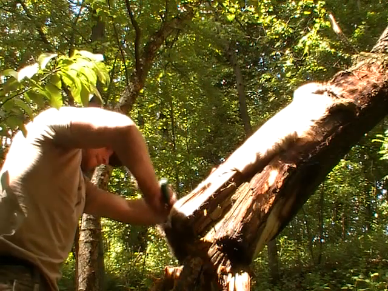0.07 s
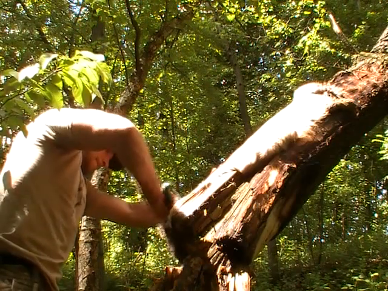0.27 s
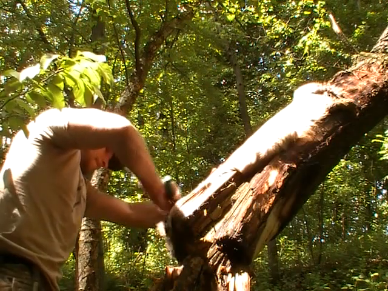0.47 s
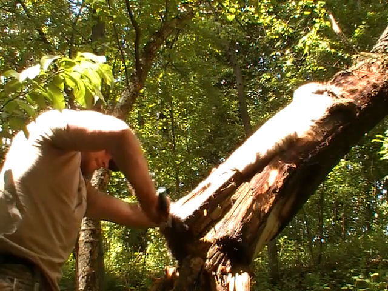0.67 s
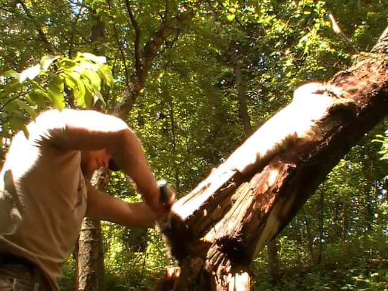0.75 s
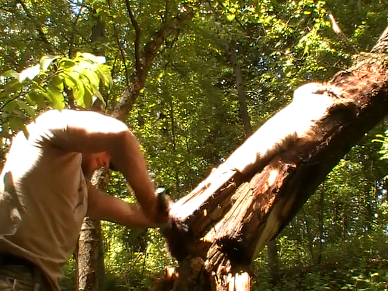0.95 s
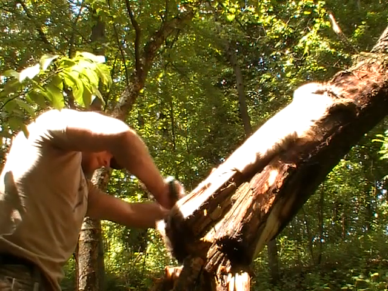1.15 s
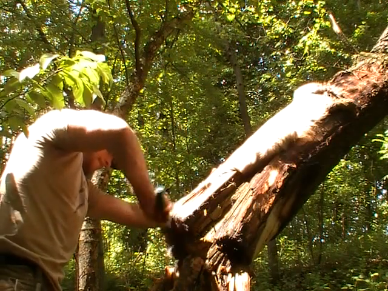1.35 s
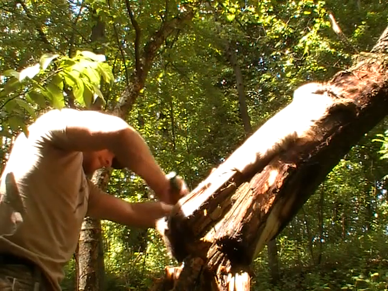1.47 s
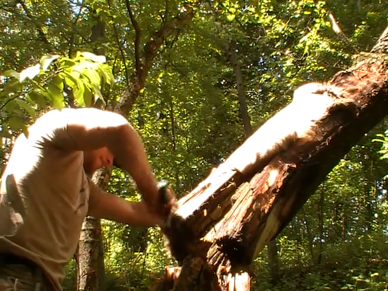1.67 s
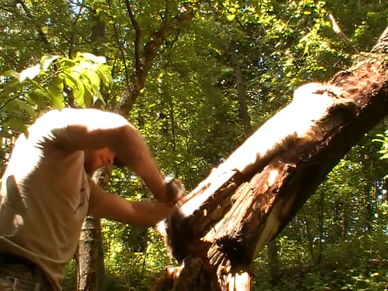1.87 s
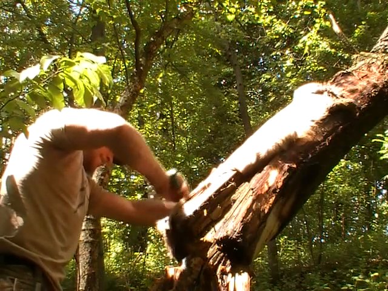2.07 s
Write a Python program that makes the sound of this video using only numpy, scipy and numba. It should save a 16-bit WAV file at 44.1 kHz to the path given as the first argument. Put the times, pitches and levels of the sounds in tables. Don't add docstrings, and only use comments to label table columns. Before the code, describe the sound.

Short, wet, gritty knife scrapes on hide in a wood, with one fly buzzing past

```python
import sys
import numpy as np
from scipy import signal
from scipy.fft import rfft, irfft
from scipy.io import wavfile
from scipy.ndimage import uniform_filter1d
from numba import njit

SR = 44100
rng = np.random.default_rng(int(sys.argv[2]) if len(sys.argv) > 2 else 0)


def gain_from_db(level_db):
    decades = np.asarray(level_db, float) / 20
    return 10 ** decades


def to_wav(sig):
    pcm = np.clip(np.atleast_2d(sig), -1, 1) * 32767
    pcm = np.round(pcm).astype(np.int16)
    wavfile.write(sys.argv[1], SR, pcm.T)


N = 92610
T = np.arange(N) / SR

# hz, level_db (per Hz)
LEAF_SPECTRUM = [(50, -38), (200, -18.5), (400, -6.5), (950, 0), (2100, -6.5), (4200, -7), (10600, -11),
                 (15600, -23)]
# start_s, level_db
BREEZE = [(0.0, -52.5), (0.13, -52.5), (0.39, -50), (0.61, -52), (1.34, -51), (2.1, -53)]

# start_s, length_s, pitch_hz, level_db, third_partial_db
CHEEPS = [(0.109, 0.044, 2500, -56.5, 3.5), (0.222, 0.042, 2470, -55, 1), (0.401, 0.041, 2530, -55, -1),
          (.566, .042, 2470, -55, -1), (0.733, 0.043, 2500, -56, 2), (1.047, .036, 2420, -58, 0),
          (1.355, .035, 2380, -58.5, -1), (1.443, 0.044, 2470, -56.5, -2.5),
          (1.603, 0.042, 2490, -54.5, -1), (1.764, 0.034, 2300, -58.5, 4), (1.911, 0.041, 2205, -58, -4),
          (2.031, 0.036, 2300, -55.5, -0.5)]
# start_s, length_s, pitch_hz, level_db
FAR_NOTES = [(1.043, 0.046, 810, -51), (0.96, .04, 720, -62), (.975, 0.06, 3340, -63),
             (1.8, .018, 5200, -53)]
# delay_s, level_db
TRUNK_ECHOES = [(.009, -8), (.021, -13), (.038, -19), (.065, -23)]

# time_s, wingbeat_hz, level_db, edge_db (per octave)
FLY_PASS = [(0.261, 197, -56, -3), (.36, 186, -68, 0), (0.408, 184.6, -55, 5), (.431, 184.5, -42, 1),
            (.4405, 184.8, -35, 0), (0.447, 186, -27.5, 0), (0.466, 188, -28.5, -1), (0.478, 198, -33, -2),
            (.5, 220, -51, -2)]
# hz, level_db
WING_TONE = [(185, -13), (370, -2), (560, .1), (750, -8), (930, -6), (1600, -15), (2200, -26), (4000, -42)]
# start_s, peak_db
BUMPS = [(.4489, -24), (.4544, -27), (.4695, -9), (.4746, -9.5), (.4785, -24), (.4832, -27), (.4877, -25)]
# mode_hz, level_db, t60_s
GRILLE_MODES = [(800, -6, .005), (1800, -5, .003), (2700, -4, .003), (3800, -7, .002), (5200, -2, .0018),
                (7000, -4, .0014), (8800, -2, .0016), (10800, 0, .002), (13000, -5, .0015)]

# start_s, peak_db
SNAGS = [(0.226, -33), (0.264, -42), (0.5475, -38), (0.8542, -37), (0.8755, -35), (0.9136, -37),
         (1.1818, -33), (1.1905, -35), (1.2234, -26), (1.228, -29), (1.2387, -34), (1.2463, -45),
         (1.546, -37), (1.795, -43), (1.8078, -42), (1.8173, -32), (1.85, -42)]

# time_s, pressure_db, slide_db (a faster blade hisses more against the drag)
STROKES = [
    [(0.18, -60, -5), (0.186, -53.5, -11), (0.216, -48, -1), (0.228, -41.5, -13.5), (0.256, -50.5, -5),
     (0.264, -48.5, -4), (0.285, -56, -4)],
    [(0.51, -49, -7), (0.52, -51, -12), (0.536, -45.5, -3.5), (0.574, -47, -5.5), (0.594, -62, -1.5),
     (0.6, -57, -9), (0.605, -64, 4)],
    [(0.81, -64, -9), (0.842, -47, -14), (0.864, -47, -1), (0.886, -47.5, -3.5), (0.922, -53, 4),
     (0.932, -55, -1), (0.938, -63, 5)],
    [(1.15, -56, -20), (1.162, -46, -11), (1.184, -43, -8), (1.246, -47.5, 0.5), (1.274, -56.5, -2)],
    [(1.472, -59, -15), (1.494, -48, -20), (1.522, -45.5, -7), (1.562, -45.5, -7), (1.588, -64, 1)],
    [(1.788, -59, -8), (1.798, -45.5, -13), (1.818, -48.5, -3), (1.856, -49.5, -1), (1.892, -55.5, 1.5),
     (1.905, -61, 2)],
    [(2.082, -68, -2), (2.088, -51, -14), (2.1, -50.5, -11)],
]
# upper_rings_db, lowest_ring_hz, lean_db (change of upper rings start to end)
TENSION = [(-1, 1056, 0), (0.5, 1085, -4), (2.5, 1034, 10), (4, 1052, 2), (1, 1056, 0), (3, 1017, -12),
           (4, 1080, -3)]
# ratio, width_hz, level_db
HIDE_RINGS = [(1, 400, 0), (1.55, 650, -3.5), (2.15, 1100, -6), (3.3, 2200, -6)]
# hz, level_db (per Hz)
EDGE_HISS = [(1500, -24.5), (2800, -4.5), (5700, -7.5), (7800, -1), (12500, -6), (15600, -16)]
# time_s, slip_hz, level_db
SQUEAK = [(1.162, 1150, -55), (1.168, 1750, -48), (1.173, 2290, -47.5), (1.186, 2330, -46),
          (1.192, 2050, -47), (1.198, 1550, -48), (1.204, 1250, -55)]
# time_s, slip_hz, level_db
CREAK = [(1.468, 1400, -65), (1.49, 1660, -53), (1.506, 1763, -55), (1.518, 1370, -57), (1.532, 980, -58),
         (1.54, 980, -49)]


def level(x, db):
    return x * gain_from_db(db) / np.sqrt(np.mean(x ** 2))


@njit
def svf(x, hz, width):
    y, band, low = np.empty(len(x)), 0., 0.
    for i in range(len(x)):
        g, k = np.tan(np.pi * hz[i] / SR), width / hz[i]
        v = (band + g * (x[i] - low)) / (1 + g * (g + k))
        band, low, y[i] = 2 * v - band, low + 2 * g * v, k * v
    return y


def svf_twice(x, hz, first_width, second_width):
    return svf(svf(x, hz, first_width), hz, second_width)


def colour(x, table, size=2048):
    hz, db = np.array(table).T
    f = np.arange(size // 2 + 1) * SR / size
    cepstrum = irfft(np.interp(np.log(f + 1), np.log(hz), db) * np.log(10) / 20)
    cepstrum[1:size // 2] *= 2
    cepstrum[size // 2 + 1:] = 0
    return signal.fftconvolve(x, irfft(np.exp(rfft(cepstrum))))[:N]


def walk(rate_hz):
    k = int(SR / rate_hz)
    held = np.repeat(rng.standard_normal(N // 100), k)[:N]
    slewed = uniform_filter1d(uniform_filter1d(held, k), k)
    return slewed / slewed.std()


def grit():
    grain_db = 3.6 * np.minimum(rng.exponential(size=N), 4)
    return level(rng.standard_normal(N) * gain_from_db(grain_db), 0)


def swing(rows):
    s, hz, db = np.array(rows).T[:3]
    edge = np.clip(np.minimum(T - s[0], s[-1] - T) * 200, 0, 1)
    return np.cumsum(np.interp(T, s, hz)) / SR, gain_from_db(np.interp(T, s, db)) * edge


def far_leaves():
    air, swell = colour(rng.standard_normal(N), LEAF_SPECTRUM), walk(2.7)
    spec, f = rfft(air), np.arange(N // 2 + 1) * SR / N
    out = 0
    for k in range(11):
        share = np.clip(1 - np.abs(np.log2(f / 20 + 1e-9) - k), 0, 1)
        flicker_db = 0.3 * swell + 0.8 * walk(8.03)
        out = out + irfft(spec * share, N) * gain_from_db(flicker_db)
    return level(out, -0.86) * gain_from_db(np.interp(T, *np.array(BREEZE).T))


def birds():
    rise, fall, top_at = .085, .06, .35
    sharpen_db = 6
    out, flutter, waver = np.zeros(N), [walk(220) for _ in range(5)], walk(200)
    for s, length, hz, db, third_db in CHEEPS:
        i = slice(int(s * SR), int((s + length) * SR))
        u = (T[i] - s) / length
        before_top = rise * (1 - u / top_at) ** 2
        after_top = fall * ((u - top_at) / (1 - top_at)) ** 2
        sag = np.where(u < top_at, before_top, after_top)
        phase = 2 * np.pi * np.cumsum(hz * (1 - sag + .01 * waver[i])) / SR
        swell = np.sin(np.pi * np.clip(u, 0, 1)) ** 0.34
        for k, part_db in enumerate([-11, 0, third_db, -7, -10]):
            tilt_db = sharpen_db * (min(k, 2) - 1.5) * (2 * u - 1)
            gain = gain_from_db(db + 3.5 + part_db + tilt_db + 2.8 * flutter[k][i])
            out[i] += gain * swell * np.sin((k + 1) * phase)
    for s, length, hz, db in FAR_NOTES:
        u = np.clip((T - s) / length, 0, 1)
        phase = 2 * np.pi * np.cumsum(hz * (1 - .05 * (1 - u) ** 2)) / SR
        out += gain_from_db(db + 1) * np.sin(np.pi * u) * np.sin(phase)
    echoes = sum(gain_from_db(db) * np.pad(out, (int(s * SR), 0))[:N] for s, db in TRUNK_ECHOES)
    return out + echoes


def grille_bumps():
    out, t = np.zeros(N), np.arange(1024) / SR
    for (s, db), chance in zip(BUMPS, rng.standard_normal((len(BUMPS), len(GRILLE_MODES)))):
        tick = 0
        for (hz, mode_db, t60), c in zip(GRILLE_MODES, chance):
            ring = np.sin(2 * np.pi * hz * (1 + 0.093 * c) * t)
            tick = tick + gain_from_db(mode_db + 2 * c) * ring * gain_from_db(-60 * t / t60)
        start = int(s * SR)
        out[start:start + len(t)] += gain_from_db(db) * tick / np.abs(tick).max()
    return out


def fly():
    turn, gain = swing(FLY_PASS)
    turn = turn - turn[int(.4492 * SR)]
    s, wingbeat_hz, _, edge_db = np.array(FLY_PASS).T
    wing_hz, wing_db = np.array(WING_TONE).T
    beats = 0
    for k in range(1, 20):
        db = np.interp(np.log(k * np.interp(T, s, wingbeat_hz)), np.log(wing_hz), wing_db)
        db = db + np.interp(T, s, edge_db) * np.log2(k / 2)
        strength = gain_from_db(db + 1.8 * walk(87.2))
        wobble_rad = .26 * np.sqrt(k) * walk(90.0)
        beats = beats - strength * np.cos(2 * np.pi * k * turn + wobble_rad)
    whirr = colour(rng.standard_normal(N), [(80, -36)] + WING_TONE) * (1 + np.cos(2 * np.pi * turn))
    rasp_hz, rasp_width_hz = 9000 * np.exp(.08 * walk(370)), 4500
    gate = np.exp(-((2 * turn + 0.042) % 1) / .27)
    rasp = gate * gain_from_db(2.1 * walk(420)) * svf_twice(grit(), rasp_hz, 1. * rasp_width_hz, 2. * rasp_width_hz)
    return gain * (level(beats, 0) + level(whirr, -12) + level(rasp, -14.5))


def snags():
    out, t = np.zeros(N), np.arange(512) / SR
    for (s, db), chance in zip(SNAGS, rng.standard_normal((len(SNAGS), 4))):
        hz = np.clip(3500 * np.exp(.6 * chance), 900, 13000)
        tick = np.sin(2 * np.pi * hz[:, None] * t).sum(axis=0) * gain_from_db(-60 * t / .002)
        start = int(s * SR)
        out[start:start + len(t)] += gain_from_db(db - 3) * tick / np.abs(tick).max()
    return signal.sosfilt(signal.butter(2, 700, "high", fs=SR, output="sos"), out)


def squeak_and_creak():
    turn, gain = swing(SQUEAK)
    phase = 2 * np.pi * turn + .33 * walk(400)
    first = gain_from_db(3.7 * walk(300) + 3.5) * np.sin(phase + 0.45 * walk(400))
    second = gain_from_db(.6 + walk(300)) * np.sin(2 * phase)
    squeak = gain * (first + second) * np.sqrt(2)
    turn, gain = swing(CREAK)
    creak = gain * gain_from_db(3.0 * walk(200)) * np.sin(2 * np.pi * turn + 1.2 * walk(300)) * np.sqrt(2)
    return squeak + creak


def knife():
    fade_s, judder_hz = 0.019, 130
    gain, slide_db, upper_db, ring_hz = np.zeros(N), np.zeros(N), np.zeros(N), np.full(N, 1000.)
    for rows, (stroke_upper_db, hz, lean_db) in zip(STROKES, TENSION):
        s, pressure_db, fast_db = np.array(rows).T
        edge = np.clip(np.minimum(T - s[0], s[-1] - T) / fade_s + 1, 0, 1) ** 2
        on = edge > 0
        gain += edge * gain_from_db(np.interp(T, s, pressure_db))
        slide_db += on * np.interp(T, s, fast_db)
        along = (T - s[0]) / (s[-1] - s[0]) - .5
        upper_db[on] = (stroke_upper_db + lean_db * along)[on]
        ring_hz[on] = hz
    upper_db = upper_db + 0.07 * slide_db
    slips, drag = grit(), 0
    for k, (ratio, width_hz, db) in enumerate(HIDE_RINGS):
        hz = ring_hz * ratio * np.exp(.04 * walk(40))
        ring_db = db + (k > 0) * upper_db + 1.8 * walk(judder_hz)
        drag = drag + gain_from_db(ring_db) * level(svf_twice(slips, hz, 1. * width_hz, 1. * width_hz), 0)
    hiss = level(colour(grit(), EDGE_HISS), 3.5) * gain_from_db(slide_db + 1.6 * walk(judder_hz))
    return gain * (drag * gain_from_db(-2) + hiss)


def scene():
    mix = far_leaves() + birds() + fly() + grille_bumps() + snags() + squeak_and_creak() + knife()
    return np.tile(mix, (2, 1))


def top_cut(x):
    return signal.sosfilt(signal.butter(12, 15790, fs=SR, output="sos"), x)


def record(dry):
    cut = signal.sosfilt(signal.ellip(10, .2, 80, 15650, fs=SR, output="sos"), dry)
    cut = signal.sosfilt(signal.butter(2, 65, "high", fs=SR, output="sos"), cut)
    return top_cut(cut)


dry = scene()
out = record(dry)
to_wav(out)
```